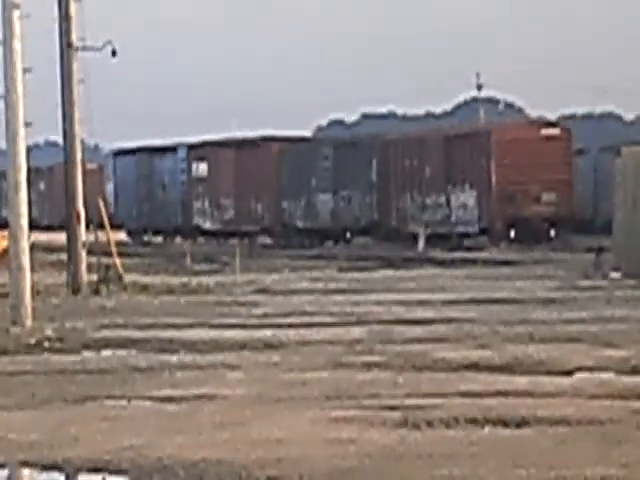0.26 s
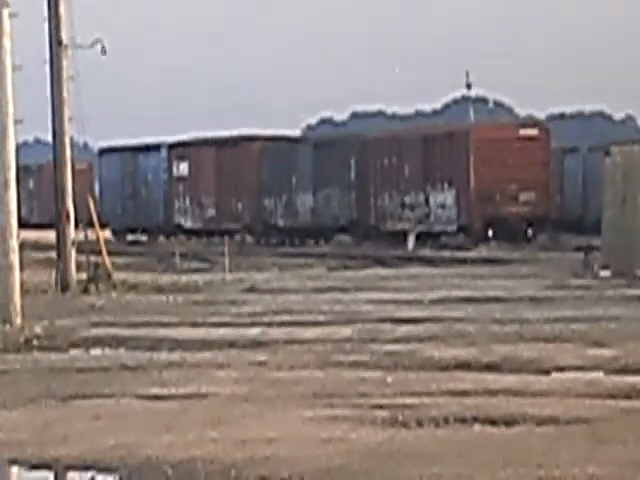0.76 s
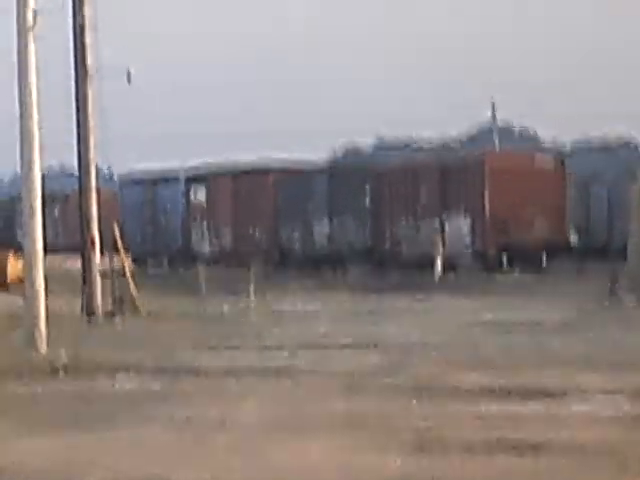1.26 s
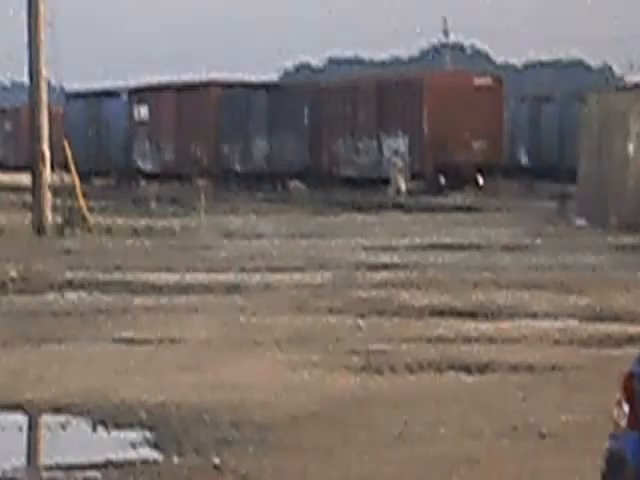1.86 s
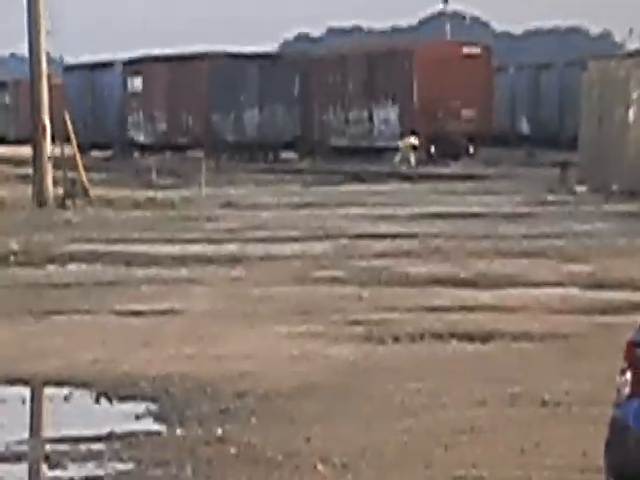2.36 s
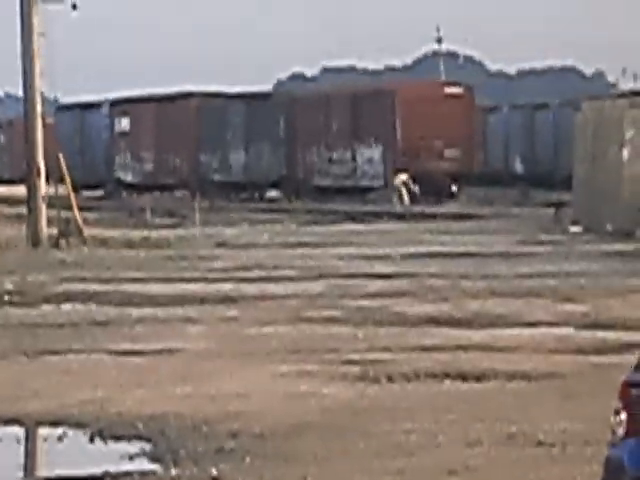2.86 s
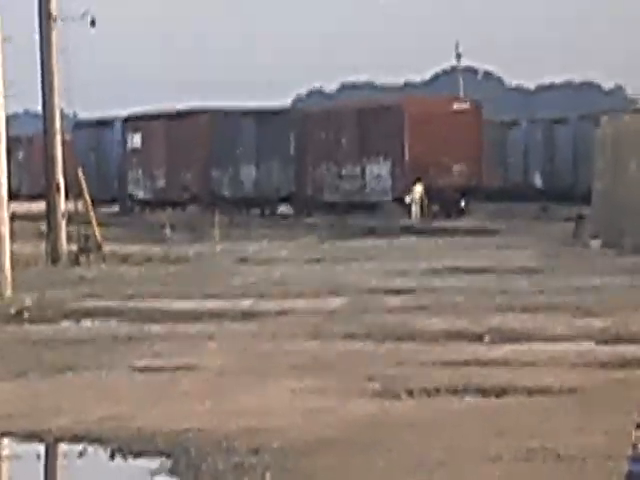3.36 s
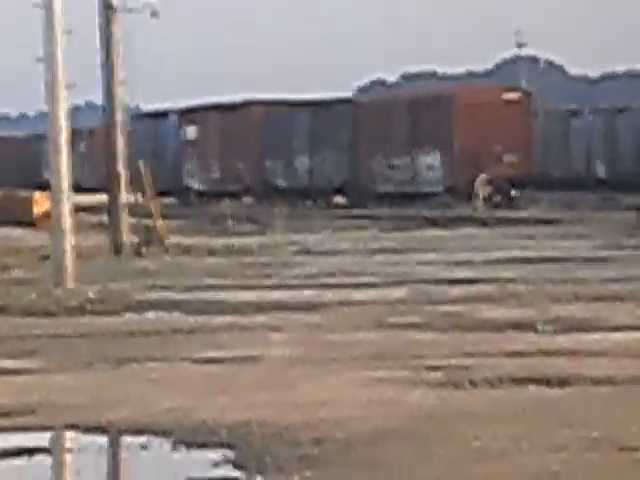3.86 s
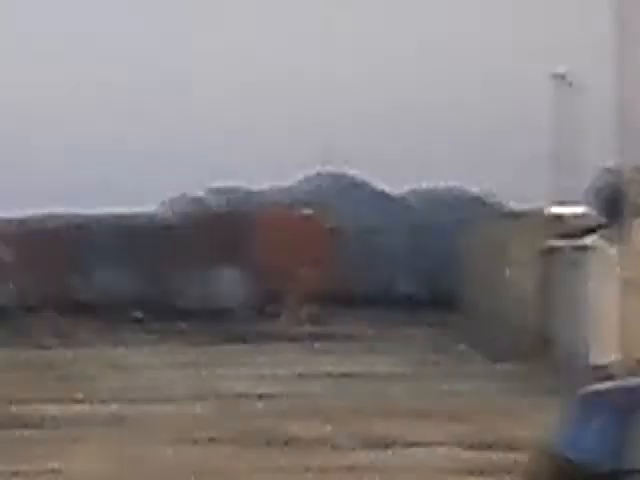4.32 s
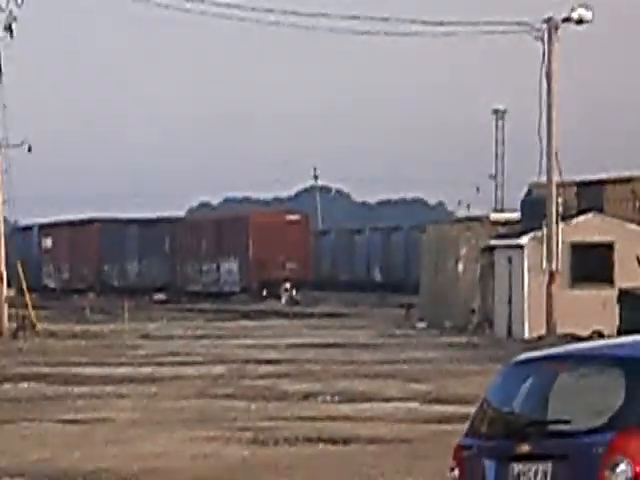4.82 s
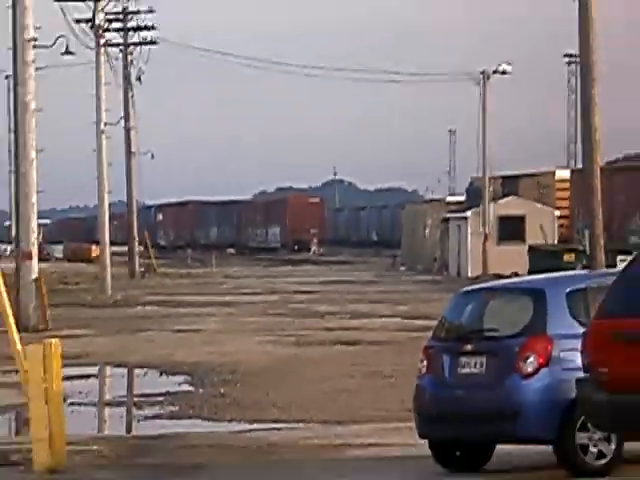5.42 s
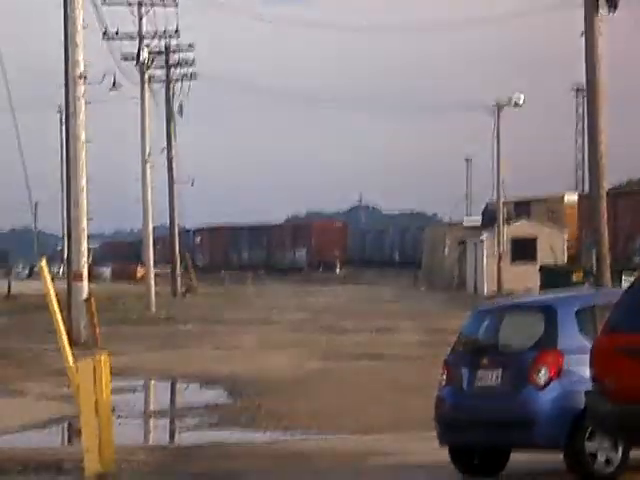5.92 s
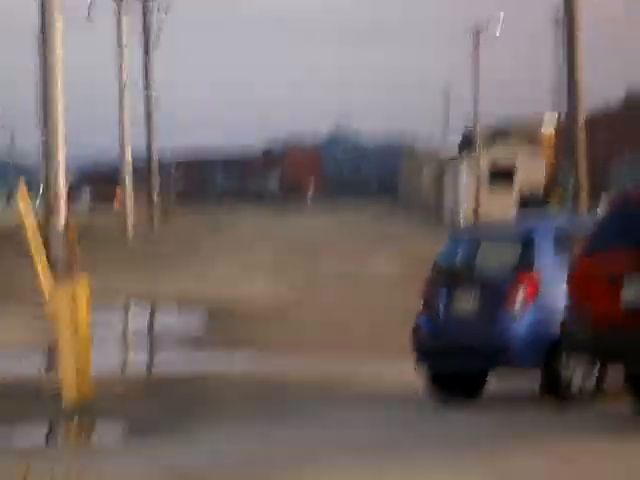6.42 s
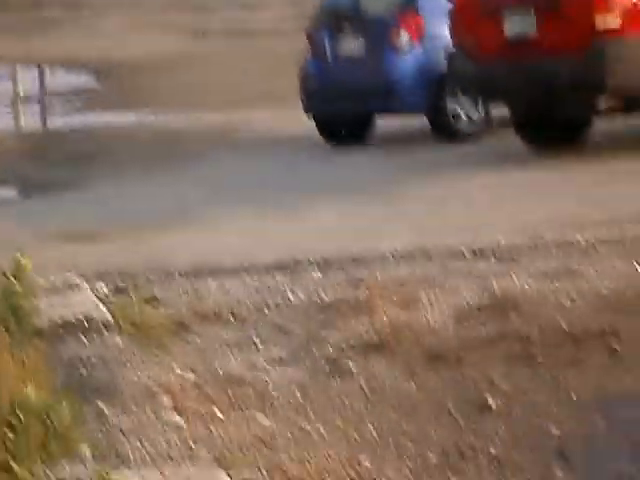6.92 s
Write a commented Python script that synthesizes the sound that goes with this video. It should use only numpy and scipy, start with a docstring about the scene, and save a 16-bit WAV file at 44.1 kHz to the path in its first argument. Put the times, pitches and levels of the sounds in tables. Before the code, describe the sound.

Several distant diesel locomotives idle with a throbbing rumble and thin steady whine under broad yard roar, while a few sharp clicks snap up close.

```python
"""Idling locomotives in a rail yard

Three distant diesel locomotives idle, each at its own crank speed, so their orders beat slowly; each is one
crank turn of pressure repeated, and its gears whine in sines tied to the crank. Fingers click on the plastic
shell of a small camera: rattles of ticks ring its modes, and the loudest overload the preamp. Faint far tones
swell and fade over the broad roar of the yard, which is noise shaped in short-time spectra."""
import sys
import numpy as np
from scipy import signal
from scipy.fft import irfft
from scipy.io import wavfile
from scipy.ndimage import uniform_filter1d

SR = 44100
rng = np.random.default_rng(int(sys.argv[2]) if len(sys.argv) > 2 else 0)


def field_ratio(decibels):
    """Amplitude ratio for a level in dB (20 dB per decade); scalars and array-likes work."""
    return 10 ** (np.asarray(decibels, dtype=float) / 20)


def file_out(sig):
    """Save sig as 16-bit WAV at sys.argv[1]."""
    # one column per channel
    cols = np.atleast_2d(sig).T
    # limit, then scale
    lim = np.clip(cols, -1, 1)
    pcm = np.round(lim * 32767).astype(np.int16)
    wavfile.write(sys.argv[1], SR, pcm)


N = 316638  # length in samples


def evened(x):
    """Normalisation: scales a signal to rms 1."""
    return x / np.sqrt(np.mean(x ** 2) + 1e-20)


def read(points, hz):
    """Interpolation of a level spectrum along a logarithmic frequency axis."""
    f, value = np.transpose(sorted(points))
    return np.interp(np.log(hz + 1), np.log(f + 1), value)


def drift(low_hz, top_hz, t):
    """Random wander by superposition: sines of random phase, weaker as they quicken, of joint rms 1."""
    wander = 0
    for f in np.geomspace(low_hz, top_hz, 20):
        wander = wander + np.sin(2 * np.pi * (f * t + rng.random())) / np.sqrt(f)
    return evened(wander)


# Engines, one row each: crank speed/(turns per s), crank angle at 0 s/turns,
# level of the unlisted orders against the roar/dB
ENGINES = [(5.1318, .0616, -9), (5.2838, .0103, -5), (5.3940, -.0071, -7)]
# Share of the roar that repeats on every turn: f/Hz, level/dB
REPEATING_SHARE = [(45, 24), (70, 17), (105, 6.5), (125, 4), (155, 11), (200, 6.5), (500, 1), (900, -3.5),
                   (1500, -4), (2500, -11.5), (4000, -18)]
# Crank orders that stand out, one list an engine: order, rms level/dB
STRONG_ORDERS = [
    [(8, -41), (15, -33), (16, -38), (17, -42), (20, -40), (106, -38), (286, -46), (585, -47)],
    [(8, -30), (9, -43), (15, -31), (16, -38), (17, -35), (73, -44), (138, -44), (144, -44), (157, -44),
     (158, -38), (226, -40), (242, -45), (433, -49)],
    [(8, -34), (11, -42), (14, -38), (15, -41), (16, -34), (17, -34), (19, -40), (27, -44), (28, -44),
     (30, -43), (79, -41), (91, -43), (100, -43), (105, -43), (113, -40), (128, -43), (158, -41)],
]
MESH = 282.27  # gear teeth meeting per crank turn
OVERTONE_DB = -17  # twice the mesh, against the mesh
# Gear whine, one value an engine: rms level/dB
MESH_DB = [-52, -34, -35]
# Sidebands of the mesh: offset/orders, level against the mesh/dB before SHAKE_DB is added
SIDEBANDS = [(-1, -14), (1, -6), (2, -7)]
# How hard the crank shakes the gears, one value an engine: level/dB
SHAKE_DB = [-6, -6, 0]
# Blower of the second engine: multiple of crank speed, rms level/dB
BLOWER = [(205.8, -48), (268.72, -45), (288.62, -42), (538.43, -53)]


def locomotive(index, hunt=0.00032, size=2 ** 15):
    """Fourier synthesis: crank orders sum to one turn of pressure, repeated as the governor hunts."""
    speed, start, share_db = ENGINES[index]
    t = np.arange(N) / SR
    coarse_t = t[::441]
    # hunt is the rms deviation of speed, as a fraction
    wander = np.interp(t, coarse_t, drift(0.2907, 3, coarse_t))
    turns = start + speed * (t + hunt * np.cumsum(wander) / SR)

    order = np.arange(size // 2 + 1)
    hz = order * speed
    # unlisted orders scatter around their share of the roar
    scatter = np.sqrt(rng.exponential(1, len(order)))
    unlisted_db = roar_db(hz) + 10 * np.log10(speed) + share_db + read(REPEATING_SHARE, hz)
    level = scatter * field_ratio(unlisted_db)
    for k, db in STRONG_ORDERS[index]:
        level[k] = field_ratio(db)
    phase = 2 * np.pi * rng.random(len(order))
    phase[8] = 0  # the exhaust beat, eight a turn, marks the crank angle
    one_turn = irfft(level * np.exp(1j * phase)) * size / np.sqrt(2)
    closed_turn = np.append(one_turn, one_turn[0])
    sound = np.interp(turns % 1 * size, np.arange(size + 1), closed_turn)

    tones = [(MESH, MESH_DB[index]), (2 * MESH, MESH_DB[index] + OVERTONE_DB)]
    for offset, db in SIDEBANDS:
        tones.append((MESH + offset, MESH_DB[index] + db + SHAKE_DB[index]))
    if index == 1:
        tones += BLOWER
    for multiple, db in tones:
        sound += np.sqrt(2) * field_ratio(db) * np.cos(2 * np.pi * (multiple * turns + rng.random()))
    return sound


def ring(modes, pitch, t):
    """Modal decay: dying sines of a struck body; neighbouring modes swing oppositely at the microphone."""
    total = np.zeros(len(t))
    for k, (hz, db, t60) in enumerate(modes):
        decay = field_ratio(db - 60 * t / t60)
        total += (-1) ** k * decay * np.sin(2 * np.pi * hz * pitch * t)
    return total


# Finger clicks: t/s, tick peak level/dB before overload, thud peak against the tick/dB,
# rattle length/ms, factor on the mode frequencies
CLICKS = [(1.2423, -1, -6, .6, .99), (1.6700, -19, -25, .8, 1.15), (1.6748, -20, -25, .8, 1.05),
          (1.7362, -16, -25, .8, 1.1), (2.2113, -20, -14, 14, 1.1), (4.1826, -19, -25, .8, 1.15),
          (4.3675, 6, -1, 4.0, 1.0), (5.5228, 3, 4, 4.0, .99), (6.2284, -5, -25, .5, 1.0)]
# Modes of the camera shell, before the pitch factor: f/Hz, relative level/dB, t60/s
SHELL = [(1774, -5.5, 0.01), (2390, -3, 0.0071), (2530, -1.5, 0.0075), (3075, 2, 0.005), (3340, -2.5, 0.01),
         (3930, -5.5, 0.004)]
# Modes of the grip and body, before the pitch factor: f/Hz, relative level/dB, t60/s
THUD = [(147, -4.5, 0.02), (265, -2, 0.025), (600, 0, 0.01), (776, 4.5, .01), (1187, 4.5, 0.0098)]


def clicks():
    """Impulsive excitation: a short dense rattle of ticks rings the shell and thuds the body."""
    out = np.zeros(N)
    t = np.arange(1500) / SR
    draws = rng.random((len(CLICKS), 2, 1500))
    for (s, peak_db, thud_db, rattle_ms, pitch), (chance, side) in zip(CLICKS, draws):
        u = t * 1000 / rattle_ms
        # full force for the length of the rattle, then a weak dying chatter
        force = np.exp(-u ** 4) + .4 * np.exp(-u * .6)
        struck = (chance < .15) | (t == 0)
        ticks = struck * np.sign(side - .5) * force
        ticks = np.convolve(ticks, np.hanning(9))  # each contact lasts 0.2 ms, which dulls the top
        tick = np.convolve(ticks, ring(SHELL, pitch, t))
        thud = np.convolve(ticks, ring(THUD, pitch, t))
        sound = tick / abs(tick).max() + field_ratio(thud_db) * thud / abs(thud).max()
        out[round(s * SR):][:len(sound)] += field_ratio(peak_db) * sound
    return out


# Faint far tones: t/s, length/s, f/Hz at the start, rms level/dB at full swell, glide/(Hz per s)
TONES = [(2.5, 1.45, 439, -40, 5), (6.4, 1.2, 1004, -40, -1)]


def moans(rise_s=.15, fall_s=.4):
    """Frequency glide: far near-sines whose phase is quadratic in time swell, slide a little and fade."""
    out = np.zeros(N)
    for s, length, hz, db, glide in TONES:
        t = np.arange(0, min(length, N / SR - s - .001), 1 / SR)  # stops with the scene
        shape = np.clip(np.minimum(t / rise_s, (length - t) / fall_s), 0, 1)
        turns = hz * t + glide * t ** 2 / 2 + rng.random()
        out[round(s * SR):][:len(t)] += np.sqrt(2) * field_ratio(db) * shape * np.cos(2 * np.pi * turns)
    return out


# Broad roar: f/Hz, relative level/dB per Hz
ROAR = [(38, -35), (45, -18.5), (90, -9.5), (130, -3.5), (300, -4), (420, -1), (620, 2.5), (850, -1),
        (1000, -2.5), (1300, -2.5), (1550, -3.5), (1700, -12.5), (2250, -9.5), (2600, -18)]
# Treble of the roar: f/Hz, relative level/dB per Hz
HISS = [(2600, -17), (2900, -13.5), (3000, -7), (3120, -15), (3500, -16.5), (4000, -16.5), (4400, -24.5),
        (4750, -33.5), (5100, -34)]
ROAR_DB = -25  # rms level of the roar before its swell, dB


def roar_db(hz):
    """Spectral density: level per Hz of the roar, the power over all frequencies summing to ROAR_DB."""
    grid = np.arange(1., SR / 2)
    total_power = np.sum(field_ratio(read(ROAR + HISS, grid)) ** 2)
    return read(ROAR + HISS, hz) + ROAR_DB - 10 * np.log10(total_power)


def roar(patchy_db=1.1, flicker_db=0.26):
    """Filtered noise: fans, exhaust rush and yard echoes as random spectra with drifting patches."""
    frames, hz = N // 512 + 5, np.fft.rfftfreq(2048, 1 / SR)
    real, imaginary, patches = rng.standard_normal((frames, 1025, 3)).T
    patches = uniform_filter1d(patches, 20, 0)  # along frequency
    patches = evened(uniform_filter1d(patches, 6, 1))  # along time
    flicker = drift(0.53, 9.7, np.arange(frames) * 512 / SR)
    level_db = roar_db(hz)[:, None] + patchy_db * patches + flicker_db * flicker
    spectra = (real + 1j * imaginary) * field_ratio(level_db)
    noise = signal.istft(spectra, nperseg=2048, noverlap=1536)[1][:N]
    return field_ratio(ROAR_DB) * evened(noise)


# Slow change of level: t/s, roar level/dB, treble level of the whole yard/dB
SWELL = [(0, -1.5, 1), (3.0, -1.36, 0.76), (5.5, -1.5, 0), (6.3, -1, -1.5), (7.18, -2, -1)]


def scene():
    """Superposition: the far yard, growing duller near the end, and the clicks at the microphone."""
    s, roar_swell_db, treble_db = np.transpose(SWELL)
    t = np.arange(N) / SR
    yard = field_ratio(np.interp(t, s, roar_swell_db)) * roar()
    for index in range(len(ENGINES)):
        yard += locomotive(index)
    high_pass = signal.firwin(101, 1900, fs=SR, pass_zero=False)
    treble = signal.oaconvolve(yard, high_pass, "same")
    yard += (field_ratio(np.interp(t, s, treble_db)) - 1) * treble
    return (yard + moans() + clicks())[None]


def roll_off(x):
    """The treble ends steeply here."""
    return signal.sosfilt(signal.butter(12, 16000, fs=SR, output="sos"), x)


def record(dry):
    """Overload: the preamp clips the loudest clicks, a steep voice-band filter overshoots and clips again."""
    loaded = np.clip(dry, -1.1, 1.1)
    dull = signal.sosfilt(signal.butter(4, 4000, fs=SR, output="sos"), loaded)
    voice_band = signal.firwin(1001, 5050, window=("kaiser", 9), fs=SR)
    narrow = signal.oaconvolve(dull, voice_band[None], "same")
    clipped = np.clip(narrow - .0045, -.98, .98)  # a small constant offset makes the clipping uneven
    smoothing = signal.firwin(63, 10900, window=("kaiser", 2), fs=SR)
    finished = signal.oaconvolve(clipped, smoothing[None], "same")
    return roll_off(finished)


dry = scene()
out = record(dry)
file_out(out)
```